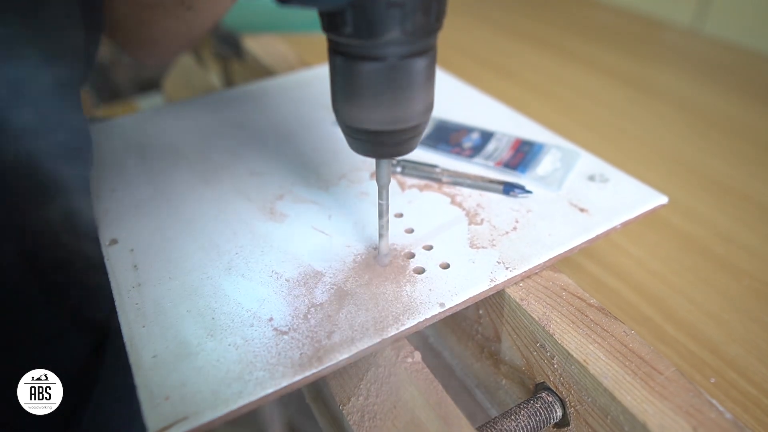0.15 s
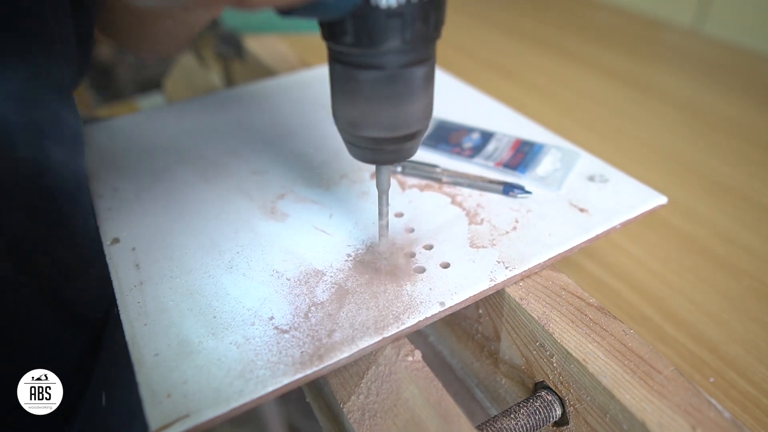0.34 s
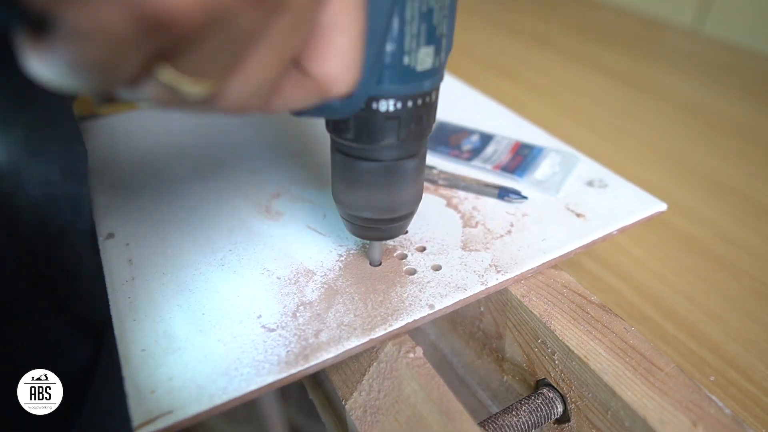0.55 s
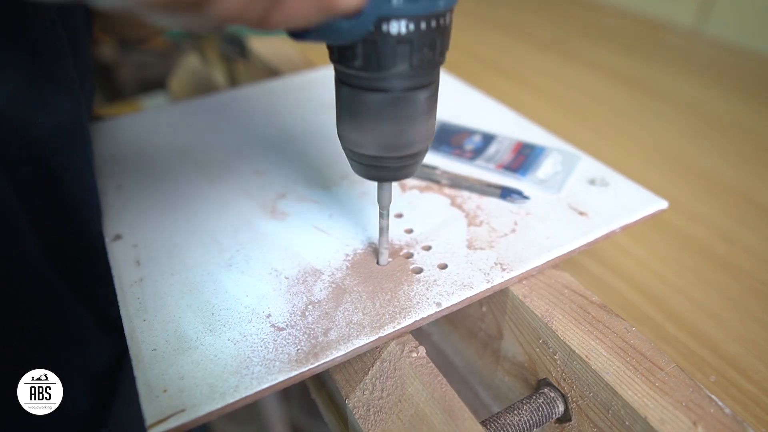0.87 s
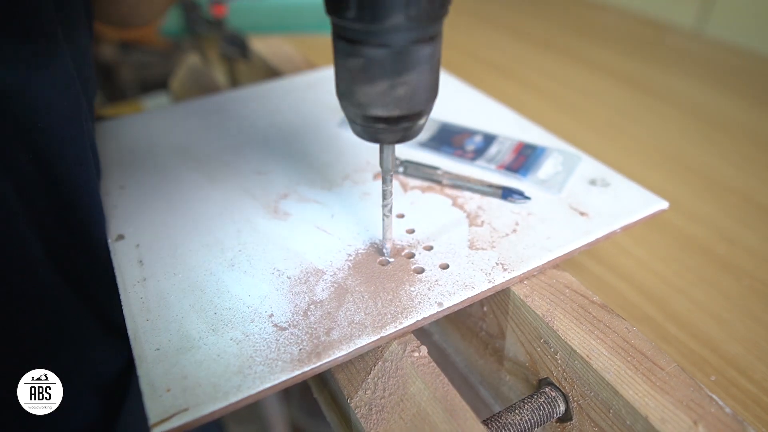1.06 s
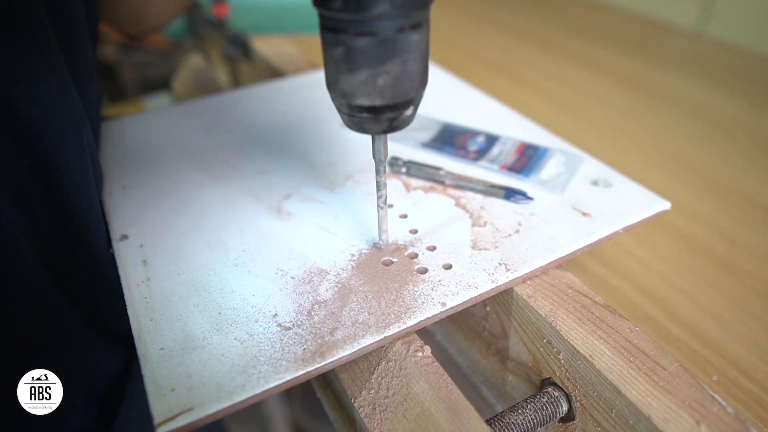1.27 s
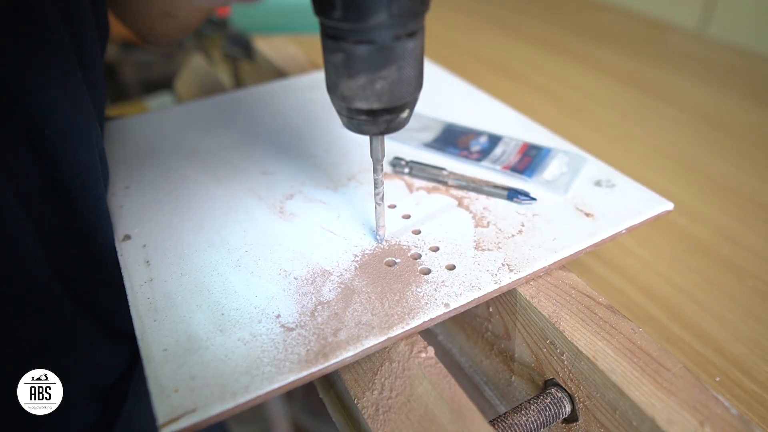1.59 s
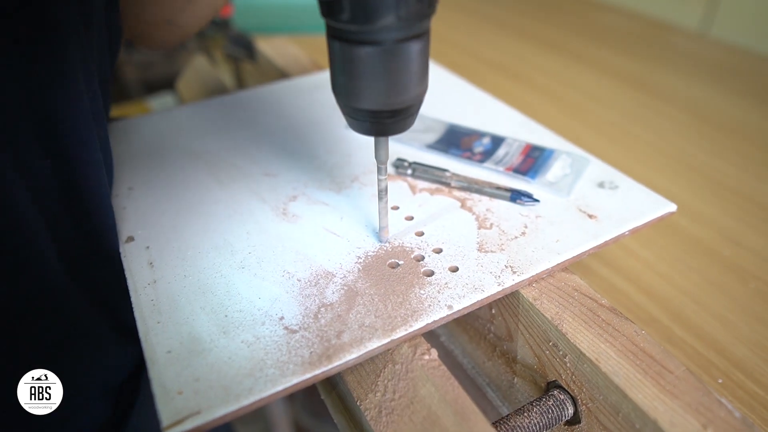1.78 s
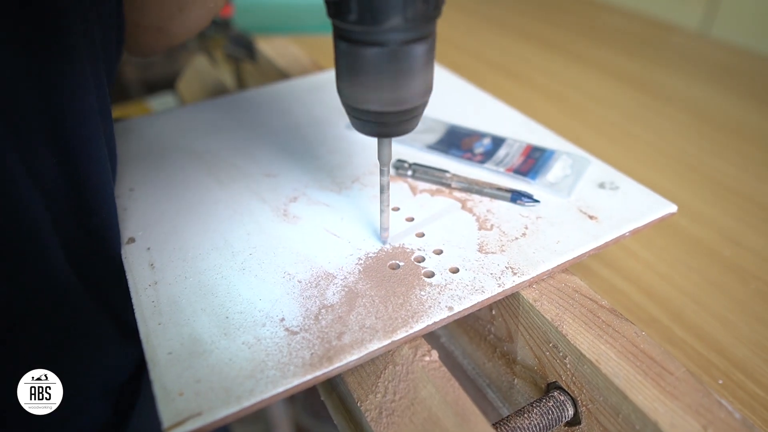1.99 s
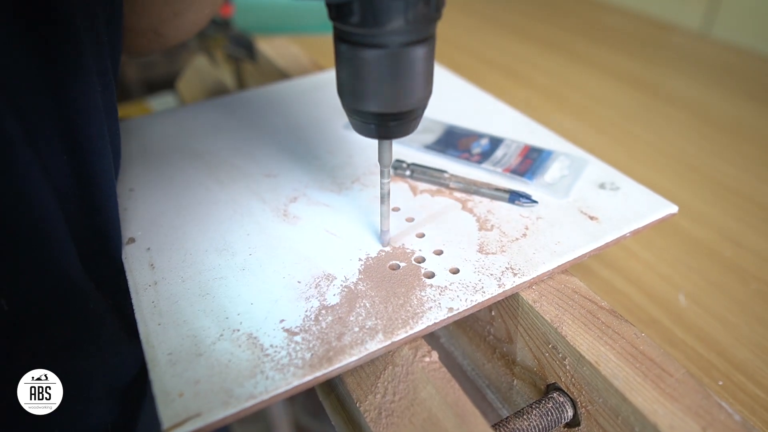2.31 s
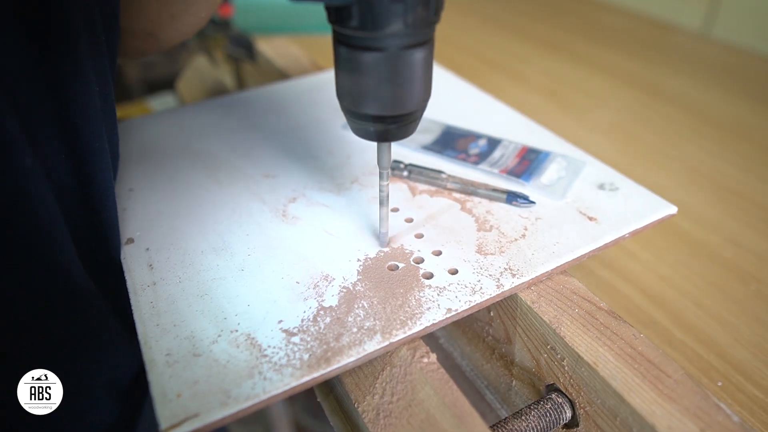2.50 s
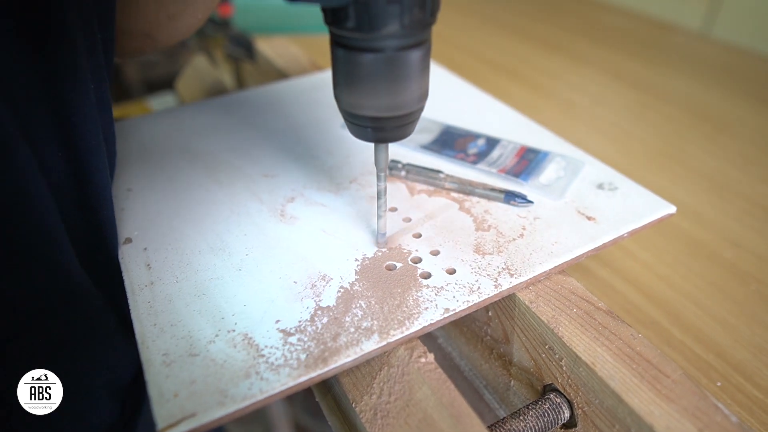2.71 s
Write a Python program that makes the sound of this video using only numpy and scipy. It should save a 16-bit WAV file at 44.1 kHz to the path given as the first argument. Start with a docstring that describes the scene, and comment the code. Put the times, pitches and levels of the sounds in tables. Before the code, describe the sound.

Close mono pickup in a small, lightly ringing workshop: a drill bores tile with harsh gear whine and thin squeals, stops clattering, revs briefly, stops, taps the tile once, and restarts into sustained grinding.

```python
"""Small workshop: a cordless drill bores a ceramic tile on a workbench, in three trigger pulls.
Gear tones follow the mesh rate; random impacts, coloured by the bodies, make the rattle and grinding.
Shaky sines make the bit's squeals and thin whistles; noise bursts and damped modes make the chuck's
clacks and one knock of the bit on the tile. Decaying noise is the room; bench and floor noise lie below.
The close microphone is mono."""
import sys
import numpy as np
from scipy import signal
from scipy.fft import rfft, irfft, next_fast_len
from scipy.io import wavfile
from scipy.ndimage import map_coordinates

SR = 44100
rng = np.random.default_rng(int(sys.argv[2]) if len(sys.argv) > 2 else 0)


def int16_out(signal):
    """Quantize to a 16-bit WAV file."""
    q = np.round(np.clip(np.atleast_2d(signal).T, -1, 1) * 32767)
    wavfile.write(sys.argv[1], SR, q.astype(np.int16))


N = 125685

# Gear speed, one list per pull [t/s, mesh rate f/Hz]
MESH_SPEED = [
    [(0, 459.6), (.15, 461.7), (.33, 455.4), (.38, 440), (.43, 398.5), (.48, 374.7), (.52, 364.5),
     (.56, 401), (.59, 453.2), (.62, 481.8), (.65, 497.2), (.68, 456.4), (.71, 365.5), (.74, 305),
     (.82, 221.8), (.86, 60.19)],
    [(.918, 150.2), (.948, 224.7), (.97, 339.8), (1.0, 429), (1.03, 467.5), (1.06, 439.5), (1.09, 367.5),
     (1.16, 148.2), (1.21, 60)],
    [(1.83, 79.9), (1.868, 224.9), (1.9, 354.2), (1.93, 412), (1.97, 450.3), (2.01, 479.5), (2.05, 497.8),
     (2.12, 509), (2.25, 507.5), (2.5, 499.7), (2.58, 493.4), (2.65, 475.3), (2.73, 463.2), (2.85, 438.7)],
]
# Effort, one list per pull [t/s, rattle level/dB, grinding level/dB], before the body gains
PULL_EFFORT = [
    [(0.0, -8, -18), (0.008, -12.5, -19), (0.35, -11.5, -18.5), (0.394, -11.5, -14.5), (0.508, -9.5, -12.5),
     (0.54, -11.5, -18), (0.706, -12.5, -19), (0.802, -15, -33), (0.81, -14.5, -36)],
    [(0.925, -9.5, -26), (0.931, -16.5, -23), (0.959, -13.5, -25.5), (0.967, -10, -19), (1.017, -15, -18.5),
     (1.053, -12.5, -23), (1.103, -12, -20), (1.125, -14, -27)],
    [(1.845, -11.5, -20.5), (1.875, -13.5, -19), (1.885, -13, -16), (1.903, -10.5, -19),
     (2.717, -11.5, -19), (2.733, -14.5, -21.5), (2.761, -11.5, -17.5), (2.797, -12.5, -20.5),
     (2.84, -9, -19)],
]
# Gear tones [multiple of mesh rate, base level/dB, nominal phase roughness/rad]
GEAR_TONES = [(.72, -38, .6), (1, -22.5, .1), (1.72, -32, .5), (2, -27, .22), (2.82, -29, 1),
              (3, -29.5, .3), (4, -28.5, .25), (5, -36, .5)]
# Pinion tones [multiple of mesh rate, base level/dB]
PINION_TONES = [(10.2, -22), (14, -17.5)]
# Resonances that the pinion tones pass [centre f/Hz, half-width/Hz, level/dB]
PINION_RESONANCES = [(3100, 220, -0.5), (4890, 550, -13)]
# Swell of the gear hum [t/s, level/dB], divided by the tone's multiple above 1
HUM_SWELL = [(0, 0), (.35, -0.5), (.47, -4.5), (.6, 5.5), (.66, 5.5), (.74, -3), (.95, -0.5), (1.03, 2.5),
             (1.12, -3.5), (1.9, 2.5), (1.98, 2.5), (2.15, 0), (2.6, -1.5), (2.85, -3.5)]
# Radiation of the gear tones by the housing [f/Hz, level/dB]
HOUSING_RADIATION = [(120, -27), (220, -23), (290, -20), (370, -6.5), (450, -1), (510, 2.5), (600, 3.5),
                     (740, 3), (920, 7), (1010, -10), (1150, 3.5), (1300, 5.5), (1420, 12.5), (1530, 3.5),
                     (2100, 2.5)]
# Colour of the gearbox and tile [f/Hz, relative level/dB]
LOW_BODY_COLOUR = [(100, -32), (220, -24), (290, -22), (380, -9), (560, -8), (720, -5), (860, -3),
                   (1030, -6), (1230, -3), (1430, 2), (1650, -6), (2000, -5), (2450, -5), (2750, -12),
                   (4000, -13)]
# Colour of the bit and chuck [f/Hz, relative level/dB]
HIGH_BODY_COLOUR = [(1760, -62), (3000, -4), (3130, -13), (3770, -11), (4260, -7), (4600, -9.5), (5070, -5),
                    (5350, -6), (5620, -0.5), (6270, 0.5), (6820, -4.5), (7880, -4), (8680, -10),
                    (9960, -7), (11500, -14.5), (12500, -13.5), (15600, -36.5)]
# Colour of the bit when it bites hard [f/Hz, relative level/dB]
BIT_COLOUR = [(3000, -19), (5300, -23), (5800, 0), (6500, 3), (6800, -5), (7150, 6), (7450, -6),
              (7900, 4.5), (8600, -17), (9900, -6.5), (12500, -24), (15500, -36)]
# Squeals of the bit in the hole [mid-fade start t/s, mid-fade end t/s, f/Hz, mean level/dB]
BIT_SQUEALS = [(-.02, 0.38, 12110, -21.5), (2.13, 2.198, 12250, -27), (2.444, 2.558, 11970, -29),
               (2.548, 2.9, 12030, -21.5)]
# Whistles as the motor brakes and starts [start t/s, end t/s, start f/Hz, end f/Hz, level/dB]
MOTOR_WHISTLES = [(0.687, 0.801, 8500, 9170, -27), (.918, 0.953, 10020, 9400, -35)]
# Chuck clacks [t/s, level/dB, low body relative level/dB]
CHUCK_CLACKS = [(.757, -12.5, -13), (0.787, -13, -16), (0.793, -12, -1), (.819, -14.5, 5.5),
                (0.8241, -18, -6), (.841, -17.5, 5), (0.8464, -14, 4), (0.9184, -18, 6), (1.099, -9.5, 0),
                (1.1324, -12, 2), (1.1631, -13.5, 3.5), (1.18, -26, -3), (1.2011, -20, 3),
                (1.204, -25.5, 4), (1.762, -20, 0.5), (1.814, -31.5, -2), (1.829, -15.5, -1.5),
                (1.8404, -18, 7)]
# Steel modes of the chuck [f/Hz, mean relative level/dB, t60/s]
CHUCK_MODES = [(1246, 11, 0.074), (1360, 8, 0.02), (1960, -9.5, 0.23), (3134, -5, 0.077),
               (4290, -4.5, 0.082), (5720, 0.5, 0.074), (6250, -3, 0.079), (6450, -6, 0.099),
               (7850, -21, 0.058), (7800, -21, 0.056), (10200, -18, .05)]
# Modes of the knocked tile [f/Hz, mean relative level/dB, t60/s]
TILE_MODES = [(560, -6, 0.043), (760, 6.5, 0.026), (880, -3, 0.028), (1205, -3.5, 0.033), (1027, -21, 0.36),
              (1155, -25, 0.31), (1730, -24.5, 0.64), (1960, -33, 0.33), (2440, -45, .08),
              (2830, -28, 0.086), (4130, -32, 0.15), (5600, -28, 0.15)]
# Room decay [f/Hz, t60/s]
ROOM_T60 = [(150, 0.36), (1000, 0.4), (3000, 0.6), (7000, 0.57), (14000, 0.26)]
# Room colour at the tail's start [f/Hz, relative level/dB]
ROOM_TINT = [(100, -2), (500, -0.5), (1500, -4), (4000, -4.5), (12000, -2)]
# Bench noise while the drill runs [f/Hz, relative level/dB]
BENCH_SPECTRUM = [(25, -15), (60, -9), (85, -1.5), (120, -7), (152, 1.5), (185, -10.5), (220, 12),
                  (260, -12), (600, -45)]
# Steady noise floor [f/Hz, relative level/dB]
FLOOR_SPECTRUM = [(25, -17), (70, -1.5), (200, -1.5), (500, 4), (1500, 4), (3000, -9), (7000, -13.5),
                  (15000, -23)]

SPIN_UP_S, COAST_DB_PER_S, SPEED_WAVER = 0.0048, 338, .0012
RATTLE_DB, GRIND_DB, CROSSOVER_HZ = -4, .5, 3350
BITE_DB = -17  # grinding above this level sets the bit ringing
FADE_S = 0.02
CLACK_T60_S, CLACK_RING_DB = 0.026, -12.5
KNOCK_S, KNOCK_DB, CONTACT_S = 1.5492, -6, 0.00056
CRACK_DB, CRACK_T60_S = -20.5, 0.084
SHIVER_DB, SHIVER_T60_S = -22.5, 0.36
LOW_CUT_HZ = 270
ROOM_DB, ROOM_DELAY_S = -10.5, .006
BENCH_DB, FLOOR_DB = -42, -40.5
BUMP_S, BUMP_HZ, BUMP_DB, BUMP_LENGTH_S = 0.587, 85, -34, .025
CEILING, TOP_HZ = 0.91, 15750


def amp(db):
    """dB to linear gain."""
    return 10 ** (np.asarray(db) / 20)


def unit(x):
    """Scale to rms 1."""
    return x / np.sqrt(np.mean(x ** 2) + 1e-20)


def clock():
    """Sample times in s."""
    return np.arange(N) / SR


def along(points, hz):
    """Interpolate [f/Hz, value] points on a log frequency axis."""
    f, v = np.transpose(points)
    return np.interp(np.log(hz + 1), np.log(f + 1), v)


def wobble(knots_per_s):
    """Smooth random curve through random knots."""
    return map_coordinates(rng.standard_normal(N // 4), [clock() * knots_per_s], mode="wrap")


def filtered(x, response):
    """Multiply the spectrum of x by response(hz)."""
    m = next_fast_len(N + SR // 2)
    return irfft(rfft(x, m) * response(np.fft.rfftfreq(m, 1 / SR)), m)[:N]


def coloured(x, spectrum):
    """Shape x by a [f/Hz, level/dB] table, rms 1."""
    return unit(filtered(x, lambda hz: amp(along(spectrum, hz))))


def tone(hz, rough, knots_per_s):
    """Sine of rms 1 with a shaking phase."""
    phase = 2 * np.pi * np.cumsum(hz + np.zeros(N)) / SR
    return np.sqrt(2) * np.sin(phase + rough * wobble(knots_per_s))


def window(start_s, end_s):
    """Gate whose linear fades are centred on the two times."""
    t = clock()
    return np.clip(np.minimum(t - start_s, end_s - t) / FADE_S + .5, 0, 1)


def ring(modes, t):
    """Damped sine modes; levels vary at random from strike to strike."""
    out = 0
    for hz, db, t60_s in modes:
        out = out + amp(db + rng.normal(0, 1.3) - 60 * t / t60_s) * np.sin(2 * np.pi * hz * t)
    return out


def add(out, start_s, x):
    """Mix x into out."""
    part = out[round(start_s * SR):][:len(x)]
    part += x[:len(part)]


def metal(x, t60_s, share):
    """Many close modes of steel and tile, as a decaying noise response added to x."""
    t = np.arange(SR // 4) / SR
    tail = rng.standard_normal(len(t)) * amp(-60 * t / t60_s)
    return x + share * signal.fftconvolve(x, tail / np.linalg.norm(tail))[:N]


def low_body(x):
    """Gearbox and tile colour, steeply cut above the crossover."""
    def response(hz):
        return amp(along(LOW_BODY_COLOUR, hz)) / np.sqrt(1 + (hz / CROSSOVER_HZ) ** 16)
    return unit(filtered(x, response))


def high_body(x):
    """Bit and chuck colour."""
    return coloured(x, HIGH_BODY_COLOUR)


def controls():
    """Mesh rate/Hz, rattle gain and grinding gain; each pull starts fast and coasts out."""
    t = clock()
    rattle, grind = np.zeros(N), np.zeros(N)
    for pull in PULL_EFFORT:
        s, rattle_db, grind_db = np.transpose(pull)
        spin_up = np.clip((t - s[0]) / SPIN_UP_S + 1, 0, 1)
        coast = amp(-COAST_DB_PER_S * np.maximum(t - s[-1], 0))
        rattle += spin_up * coast * amp(np.interp(t, s, rattle_db))
        grind += spin_up * coast * amp(np.interp(t, s, grind_db))
    mesh_hz = np.interp(t, *np.vstack(MESH_SPEED).T) * (1 + SPEED_WAVER * wobble(40))
    return mesh_hz, rattle, grind


def pinion_gain(hz):
    """Summed resonance gain at hz: the pinion chirps as it passes a peak."""
    return sum(amp(db) / (1 + ((hz - centre) / width) ** 2) for centre, width, db in PINION_RESONANCES)


def gears(mesh_hz, running):
    """Tones locked to the mesh rate: the housing colours the gears, resonances the pinion."""
    swell_db = np.interp(clock(), *np.transpose(HUM_SWELL))
    out = np.zeros(N)
    for k, db, rough in GEAR_TONES:
        level_db = db + along(HOUSING_RADIATION, k * mesh_hz) + swell_db / max(k, 1) + wobble(24.85)
        out += amp(level_db) * tone(k * mesh_hz, rough, 170)
    for k, db in PINION_TONES:
        gain = amp(db + 3.3 * wobble(120)) * pinion_gain(k * mesh_hz)
        out += gain * tone(k * mesh_hz, 0.41, 400)
    return running * out


def impacts(mesh_hz, hits_per_s, spread_db, turns_per_mesh, swell_db):
    """Dense tiny impacts that swell with each turn of a shaft."""
    hits = (rng.random(N) < hits_per_s / SR) * rng.standard_normal(N)
    turn = np.sin(2 * np.pi * turns_per_mesh * np.cumsum(mesh_hz) / SR)
    return hits * amp(spread_db * wobble(350) + swell_db * turn)


def gear_rattle(mesh_hz, rattle):
    """Gear backlash: impacts ring the gearbox and tile."""
    hits = impacts(mesh_hz, hits_per_s=8000, spread_db=1.5, turns_per_mesh=0.17, swell_db=2)
    return amp(RATTLE_DB) * rattle * low_body(metal(hits, t60_s=0.038, share=0.34))


def grinding(mesh_hz, grind):
    """The bit crushes grains of tile, and takes its ringing colour when it bites hard."""
    hits = impacts(mesh_hz, hits_per_s=9000, spread_db=2.0, turns_per_mesh=.107, swell_db=0.4)
    grains = metal(hits, t60_s=0.038, share=0.65)
    scrape = np.minimum(grind, amp(BITE_DB))
    bite = np.sqrt(grind ** 2 - scrape ** 2)  # the power above the limit
    return amp(GRIND_DB) * (scrape * high_body(grains) + bite * coloured(grains, BIT_COLOUR))


def squeals():
    """Stick-slip of the bit: high sines, rough in phase and level."""
    out = np.zeros(N)
    for a, b, hz, db in BIT_SQUEALS:
        out += amp(db + 3.2 * wobble(90)) * window(a, b) * tone(hz, 2.1, 250)
    return out


def whistles():
    """Thin sines that glide as the motor brakes and starts."""
    out = np.zeros(N)
    for a, b, start_hz, end_hz, db in MOTOR_WHISTLES:
        glide_hz = np.interp(clock(), [a, b], [start_hz, end_hz])
        out += amp(db) * window(a, b) * tone(glide_hz, .4, 300)
    return out


def clacks():
    """The chuck slams through its play: short noise clatter and steel modes."""
    out, t = np.zeros(N), np.arange(SR // 4) / SR
    low, high = low_body(rng.standard_normal(N)), high_body(rng.standard_normal(N))
    for s, db, body_db in CHUCK_CLACKS:
        noise = (amp(body_db) * low + high)[round(s * SR):][:len(t)]
        clatter = noise * amp(-60 * t / CLACK_T60_S)
        add(out, s, amp(db) * (clatter + amp(CLACK_RING_DB) * ring(CHUCK_MODES, t)))
    return out


def knock():
    """The bit is set down: tile modes softened by the contact, a noise crack and a shiver."""
    out, t = np.zeros(N), np.arange(SR // 3) / SR
    crack = high_body(rng.standard_normal(N))[:len(t)] * amp(CRACK_DB - 60 * t / CRACK_T60_S)
    shiver = low_body(rng.standard_normal(N))[:len(t)] * amp(SHIVER_DB - 60 * t / SHIVER_T60_S)
    tile = ring(TILE_MODES, t) * (1 - np.exp(-t / CONTACT_S))
    add(out, KNOCK_S, amp(KNOCK_DB) * (tile + crack + shiver))
    return out


def low_cut(x):
    """Small objects radiate little bass: second-order high-pass."""
    return signal.sosfilt(signal.butter(2, LOW_CUT_HZ, "high", fs=SR, output="sos"), x)


def workshop(x):
    """Room tail: noise whose bands each decay at their own rate."""
    hz, t, z = signal.stft(rng.standard_normal(SR * 2 // 3), SR, nperseg=256)
    decay_db = along(ROOM_TINT, hz)[:, None] - 60 * t / along(ROOM_T60, hz)[:, None]
    tail = signal.istft(z * amp(decay_db), SR, nperseg=256)[1]
    tail = np.pad(tail, (round(ROOM_DELAY_S * SR), 0))
    return signal.fftconvolve(x, tail / np.linalg.norm(tail))[:N]


def bench(running):
    """Low coloured noise while the drill runs, and one soft low bump with a bell-shaped envelope."""
    rumble = amp(BENCH_DB) * running * coloured(rng.standard_normal(N), BENCH_SPECTRUM)
    bump = np.exp(-((clock() - BUMP_S) / BUMP_LENGTH_S) ** 2) * tone(BUMP_HZ, .2, 44)
    return rumble + amp(BUMP_DB) * bump


def noise_floor():
    """Steady coloured noise."""
    return amp(FLOOR_DB) * coloured(rng.standard_normal(N), FLOOR_SPECTRUM)


def scene():
    """Sum drill, room, bench and floor; same signal in both channels."""
    mesh_hz, rattle, grind = controls()
    running = np.minimum(rattle / amp(-12), 1)
    drill = gears(mesh_hz, running) + gear_rattle(mesh_hz, rattle) + grinding(mesh_hz, grind)
    drill += squeals() + whistles() + low_cut(clacks() + knock())
    mono = drill + amp(ROOM_DB) * workshop(drill) + bench(running) + noise_floor()
    return np.array([mono, mono])


def record(dry):
    """Round off the peaks, then remove everything above the band limit."""
    soft = dry / (1 + np.abs(dry / CEILING) ** 6) ** (1 / 6)
    return np.array([filtered(ch, lambda hz: hz < TOP_HZ) for ch in soft])


dry = scene()
out = record(dry)
int16_out(out)
```